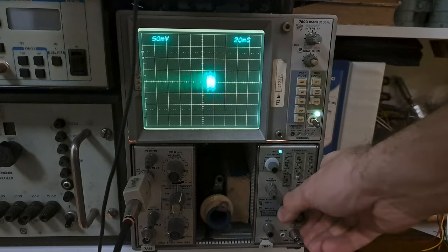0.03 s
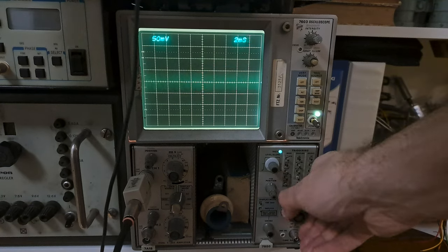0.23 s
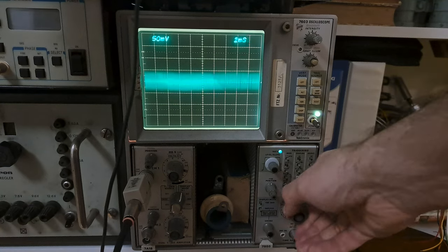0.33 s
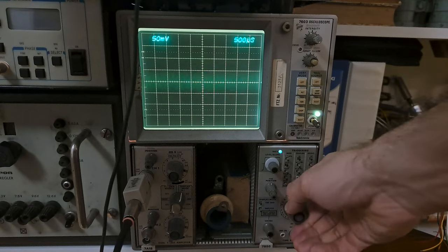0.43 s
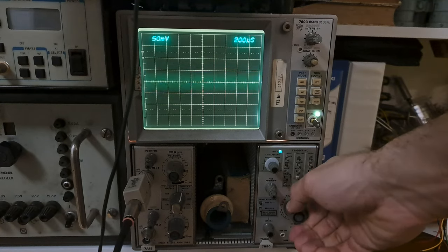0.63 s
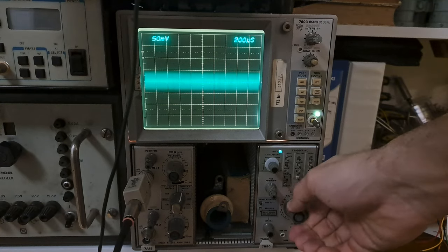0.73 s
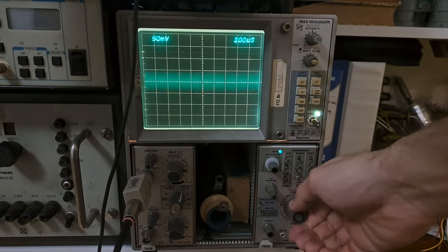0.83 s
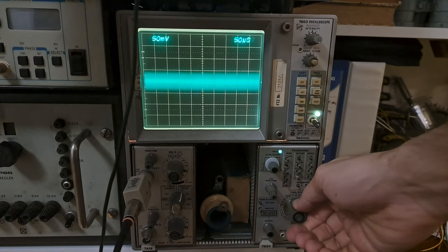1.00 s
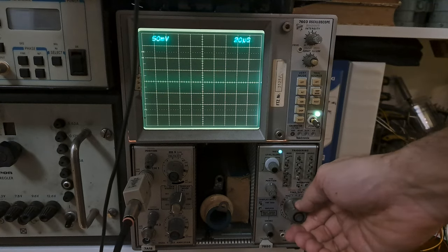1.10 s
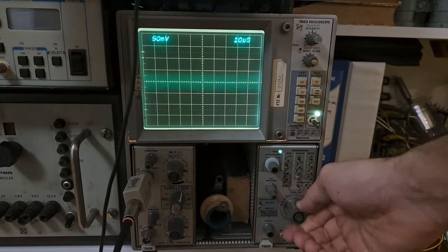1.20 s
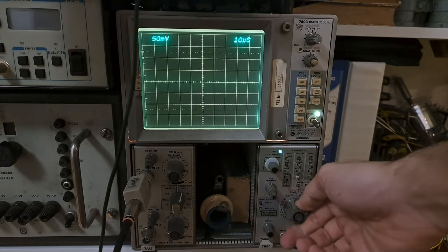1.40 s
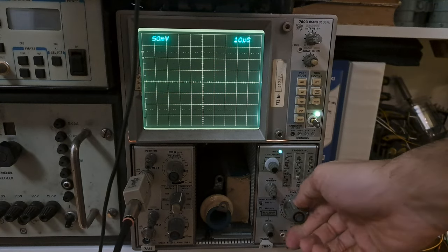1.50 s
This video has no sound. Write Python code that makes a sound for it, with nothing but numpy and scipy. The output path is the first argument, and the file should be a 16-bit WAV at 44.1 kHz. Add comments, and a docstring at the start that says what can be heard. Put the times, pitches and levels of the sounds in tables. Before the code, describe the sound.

Hard, bright knob clicks come in an uneven quick run, some split into tiny double or triple ticks, leaning left. A soft low puff and faint finger rub precede them; equipment fans hum quietly in a small room.

```python
"""A rotary range switch of an oscilloscope is turned by hand through eight detents in a small workshop.
A faint contact comes first. Each snap is noise and sine modes: a slip, a tick, the ringing metal case
and the room's answer, its bass swelling late. Equipment fans, coloured noise and steady sines, hum underneath.
As the fingers take the knob, a puff of low noise brushes the left microphone over a soft rub."""
import sys
import numpy as np
from scipy import signal
from scipy.fft import rfft, irfft, next_fast_len
from scipy.io import wavfile

SR = 44100
rng = np.random.default_rng(int(sys.argv[2]) if len(sys.argv) > 2 else 0)


def file_out(sig):
    """Save sig as 16-bit WAV at sys.argv[1]."""
    # one column per channel
    cols = np.atleast_2d(sig).T
    # limit, then scale
    lim = np.clip(cols, -1, 1)
    pcm = np.round(lim * 32767).astype(np.int16)
    wavfile.write(sys.argv[1], SR, pcm)


N = 68355

# Landings of the detent spring, some detents taking two or three steps. Each row: start in seconds,
# relative level in dB, then bass, knock, mids, edge, sheen and top in dB against the presence,
# left over right in dB, extra room in dB.
SNAPS = [(.0935, -32.5, 15.5, 16, 14.5, 7.5, -5, -17.5, -2.5, 4.5),
         (0.2126, 5, -18, -2.5, 1, -3, -3.5, 0, -2, 7), (0.2184, 4, 3, -3.5, -8, -2.5, 1.5, -0.5, -5, 5),
         (0.2244, -1, 4, 0, -1, -3.5, -4, -3, 0, 0), (0.391, -11, 2, -3.5, 4, -1, 1, -2, -1, 5.5),
         (0.3953, -8.5, 1.5, 0, 0.5, 6.5, 0, -8.5, -4, -1), (0.4857, -9, -19, 6, 8, 8, 3.5, -2, -3, 0.5),
         (.4863, -13.5, 9, 3, 2, 7.5, 2, 1, -3.5, 4), (0.6196, -7.5, 3.5, 7, 4.5, 2.5, 3, 3, -3, 3),
         (.8725, 1, -0.5, -1.5, -1, -2, 0.5, 0, -3.5, 4.5),
         (0.9509, 3, -2, 1.5, -2.5, -3.5, -2, -1.5, -3, 0.5),
         (1.1147, -1.5, 5, 2, 1.5, 2, 3.5, 5.5, -4, 2.5), (1.2453, -5, 4, 4, 5, 1.5, 1.5, 1.5, -4, 1)]
# Centres of the tone bands in Hz: bass, knock, mids, edge, presence (the reference), sheen, top.
TONE_HZ = (250, 850, 2000, 3300, 5000, 8700, 12500)
# Strongest modes of the case and the switch wafers. Each row: frequency in Hz, relative level in dB, t60 in seconds.
CASE_MODES = [(234, -49, .35), (367, -53, .35), (505, -48, .3), (609, -52, .2), (759, -49, .25),
              (910, -45, .19), (976, -43.5, .19), (1227, -48, .2), (1868, -49, .19), (2043, -49, .22),
              (2480, -48, .28), (4800, -49, .24), (6850, -49, .16), (12840, -46, .16)]
# Colour of the dense ring of the sheet-metal case. Each row: frequency in Hz, relative density in dB per Hz.
CASE_COLOUR = [(100, -23.5), (250, -24.5), (500, -10.5), (950, 6), (1400, 1), (1900, 1.5), (2350, -3),
               (3100, -1.5), (3750, -6), (4400, 2.5), (5100, 2.5), (5800, -1), (6900, 0.5), (7500, -3.5),
               (9600, -9), (10900, -0.5), (11900, -4), (12900, 1), (14100, -3.5), (16000, -18)]
# How slowly the case builds up. Each row: frequency in Hz, rise in seconds.
CASE_RISE = [(300, 0.013), (1000, .004), (3000, 0.0027), (6000, 0.0014), (13000, 0.00066)]
# How long the case rings. Each row: frequency in Hz, t60 in seconds.
CASE_T60 = [(300, 0.13), (1000, 0.043), (3000, 0.084), (6000, 0.046), (13000, 0.035)]
# Colour of the tick. Each row: frequency in Hz, relative density in dB per Hz.
TICK_COLOUR = [(500, -25), (2000, 6), (6000, -17), (13000, 26.5), (16000, -8)]
# Colour of the workshop's answer. Each row: frequency in Hz, relative density in dB per Hz.
ROOM_COLOUR = [(50, -8.5), (90, -1), (140, 12), (190, 9.5), (245, 13.5), (420, 6.5), (650, -0.5),
               (950, 2.5), (1400, -4), (2200, 0.5), (2600, 2), (3100, 0), (3600, -6.5), (4900, -1),
               (6100, -5.5), (6950, -7), (7700, -7), (9600, -13.5), (11000, -5), (12000, -6.5),
               (12900, -0.5), (14200, -10.5), (16000, -18.5)]
# How slowly the room swells. Each row: frequency in Hz, rise in seconds.
ROOM_RISE = [(150, 0.055), (400, 0.033), (1000, 0.015), (4000, 0.011), (14000, 0.0034)]
# How long the room lasts. Each row: frequency in Hz, t60 in seconds.
ROOM_T60 = [(125, 0.41), (275, 0.28), (600, 0.38), (1300, 0.32), (2800, 0.34), (6400, 0.34), (14000, 0.23)]
# Likeness of left and right. Each row: frequency in Hz, correlation from -1 to 1.
LIKENESS = [(60, .85), (130, .92), (290, .85), (600, .75), (900, .62), (1250, 0), (15000, 0)]
# Colour of the puff of air. Each row: frequency in Hz, relative density in dB per Hz.
PUFF_COLOUR = [(24, -30), (38, -5.5), (52, 0), (70, -5), (130, -15.5), (300, -26.5), (1000, -80)]
# Colour of fingers sliding on the knob. Each row: frequency in Hz, relative density in dB per Hz.
RUB_COLOUR = [(100, -3), (300, -5), (1000, 0), (3300, -6), (5000, -27.5), (16000, -27.5)]
# Colour of the fan rush. Each row: frequency in Hz, relative density in dB per Hz.
FAN_COLOUR = [(25, -18), (45, -6), (80, -8), (150, -1), (280, 1), (400, -5.5), (550, -7.5), (1000, -15),
              (1450, -24), (2200, -31.5), (2700, -30), (3400, -42.5), (7000, -39), (9500, -42),
              (13000, -37.5), (16000, -42.5)]
# Steady tones of fans and mains. Each row: frequency in Hz, rms level in dB.
HUM = [(168, -74), (234, -68.5), (296, -65.5), (463, -81)]

# Layers of a snap, before its own level and tone
SLIP_DB, SLIP_S = -39, 0.00056   # fades by a factor e in SLIP_S on both sides of the landing
TICK_DB, TICK_RISE_S, TICK_T60_S, TICK_PAN_DB = -19, .0005, 0.0043, 5
CASE_DB, MODES_DB, MODE_SCATTER_DB = -24, 2.5, 1.5
ROOM_DB, ROOM_PAN_DB = -35, -2
SAME_RING = .6   # share of the response's power that every snap has in common

# Stereo picture
RIGHT_LAG_S = .0003
PAN_FROM_HZ = 680   # the bass-to-treble panning crossover
BASS_LEFT_DB = 2   # the bass is a little stronger on the left

# Hand and fans
PUFF_S, PUFF_LENGTH_S, PUFF_DB = 0.092, 0.077, -39
PUFF_RIGHT_DB = -40   # right against left
RUB_S, RUB_LENGTH_S, RUB_DB = 0.093, .11, -65
FAN_DB = -58

CUTOFF_HZ = 15800
TIME = np.arange(N) / SR
SIZE = next_fast_len(N, real=True)
FREQS = np.maximum(np.arange(SIZE // 2 + 1) * SR / SIZE, 1)
SIDES = np.array([[1], [-1]])   # left, right


def switch():
    """Every snap excites a short slip, a tick, the case and the room, all sharing its tone."""
    out = np.zeros((2, N))
    case = noise_spectrum(CASE_COLOUR)
    workshop = noise_spectrum(ROOM_COLOUR)
    for start, level_db, bass, knock, mids, edge, sheen, top, pan_db, room_db in SNAPS:
        age = np.maximum(TIME - start - RIGHT_LAG_S * np.array([[0], [1]]), 0)
        tone = list(zip(TONE_HZ, (bass, knock, mids, edge, 0, sheen, top)))
        tone_gain = from_db(at_hz(tone, FREQS))
        metal = varied(case, CASE_COLOUR, start) * tone_gain * pan(pan_db)
        answer = varied(workshop, ROOM_COLOUR, start) * tone_gain * pan(pan_db + ROOM_PAN_DB)
        snap = detent_slip(metal, start)
        snap = snap + detent_tick(age, tone_gain, pan_db)
        snap = snap + from_db(CASE_DB) * ring_out(metal, age, CASE_RISE, CASE_T60)
        snap = snap + case_modes(age, tone, pan_db)
        snap = snap + from_db(ROOM_DB + room_db) * ring_out(answer, age, ROOM_RISE, ROOM_T60)
        out += from_db(level_db) * snap
    return out


def detent_slip(metal, start):
    """The roller slips over the crest: metal noise swelling into the landing and fading just as fast."""
    return from_db(SLIP_DB) * wave(metal) * np.exp(-np.abs(TIME - start) / SLIP_S)


def detent_tick(age, tone_gain, pan_db):
    """The spring strikes home: a burst of noise only milliseconds long."""
    noise = wave(noise_spectrum(TICK_COLOUR) * tone_gain * pan(pan_db + TICK_PAN_DB))
    return from_db(TICK_DB) * noise * burst(age, TICK_RISE_S, TICK_T60_S)


def case_modes(age, tone, pan_db):
    """Decaying sines for the strongest modes; the high ones reach the two microphones in unrelated phase."""
    out = 0
    for hz, db, t60 in CASE_MODES:
        apart = 1 - at_hz(LIKENESS, hz)
        phase = 2 * np.pi * (rng.random() + apart ** 2 * rng.random((2, 1)))
        scatter_db = MODE_SCATTER_DB * rng.standard_normal()
        gain = from_db(db + at_hz(tone, hz) + scatter_db + SIDES * apart * pan_db / 2)
        # each mode needs about two cycles to build up
        out = out + gain * np.sin(2 * np.pi * hz * age + phase) * burst(age, 2 / hz, t60)
    return from_db(MODES_DB) * out


def varied(common, colour, start):
    """A response from this moment on, partly the same for every snap and partly its own."""
    delayed = common * np.exp(-2j * np.pi * FREQS * start)
    return np.sqrt(SAME_RING) * delayed + np.sqrt(1 - SAME_RING) * noise_spectrum(colour)


def ring_out(spectrum, age, rise, t60):
    """Dense resonances as noise in which every band builds up and dies at its own pace."""
    centres = np.geomspace(125, 14000, 7)   # Hz
    out = 0
    for hz, pick in zip(centres, np.eye(len(centres))):
        # overlapping bands that add up to the whole spectrum
        band = np.interp(np.log(FREQS), np.log(centres), pick)
        out = out + wave(spectrum * band) * burst(age, at_hz(rise, hz), at_hz(t60, hz))
    return out


def hand():
    """Low noise for air brushing the left microphone, brighter noise for fingers sliding on the knob."""
    puff = wave(noise_spectrum(PUFF_COLOUR)) * swell(PUFF_S, PUFF_LENGTH_S)
    rub = wave(noise_spectrum(RUB_COLOUR)) * swell(RUB_S, RUB_LENGTH_S)
    return from_db([[PUFF_DB], [PUFF_DB + PUFF_RIGHT_DB]]) * puff + from_db(RUB_DB) * rub


def fans():
    """Cooling fans: moving air as a low rush of noise, with a few steady sine tones."""
    out = from_db(FAN_DB) * wave(noise_spectrum(FAN_COLOUR))
    for hz, db in HUM:
        # sqrt(2) turns rms into peak
        out = out + from_db(db) * np.sqrt(2) * np.sin(2 * np.pi * (hz * TIME + rng.random()))
    return out


def noise_spectrum(colour):
    """Spectrum of coloured stereo noise of rms 1, more alike left and right in the bass."""
    gain = from_db(at_hz(colour, FREQS))
    gain = gain / np.sqrt(np.mean(gain ** 2))
    alike = np.clip(at_hz(LIKENESS, FREQS), -.99, .99)
    mid, side = rfft(rng.standard_normal((2, SIZE)))
    return gain * (np.sqrt((1 + alike) / 2) * mid + np.sqrt((1 - alike) / 2) * side * SIDES)


def pan(db):
    """Left and right gains by frequency: the treble follows the pan, the bass keeps a fixed lean."""
    treble = FREQS ** 2 / (FREQS ** 2 + PAN_FROM_HZ ** 2)
    return from_db(SIDES * (db * treble + BASS_LEFT_DB * (1 - treble)) / 2)


def burst(age, rise_s, t60):
    """Envelope that swells and dies away, the decay losing 60 dB in t60 seconds."""
    return (1 - np.exp(-age / rise_s)) * from_db(-60 * age / t60)


def swell(start, length):
    """Envelope with soft edges and a level middle."""
    arch = np.sin(np.pi * np.clip((TIME - start) / length, 0, 1))
    return np.clip(2 * arch, 0, 1)


def wave(spectrum):
    """Spectrum to samples."""
    return irfft(spectrum, SIZE)[..., :N]


def at_hz(points, hz):
    """Reads a table along log frequency."""
    table_hz, value = np.transpose(points)
    return np.interp(np.log(hz), np.log(table_hz), value)


def from_db(db):
    """Decibels to gain."""
    return 10 ** (np.asarray(db) / 20)


def scene():
    """Switch, hand and fans together."""
    return switch() + hand() + fans()


def record(dry):
    """A steep elliptic low-pass cuts the top."""
    lowpass = signal.ellip(10, .2, 70, CUTOFF_HZ, fs=SR, output="sos")   # .2 dB ripple, 70 dB down
    return signal.sosfilt(lowpass, dry)


dry = scene()
out = record(dry)
file_out(out)
```